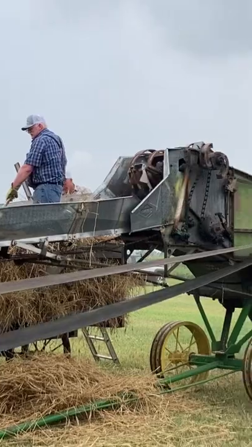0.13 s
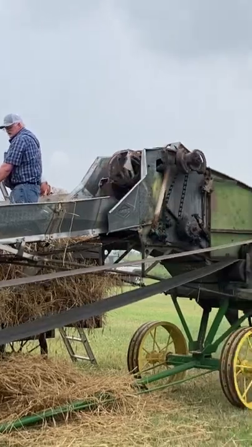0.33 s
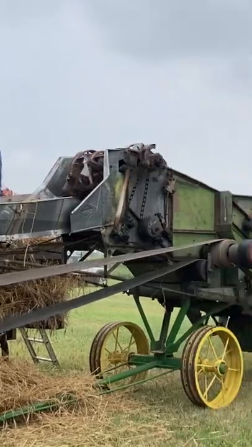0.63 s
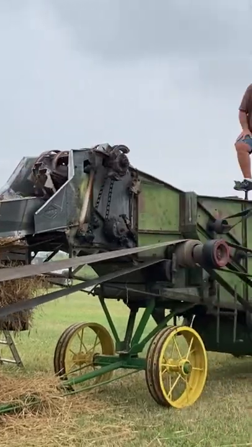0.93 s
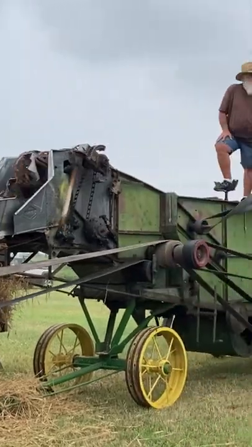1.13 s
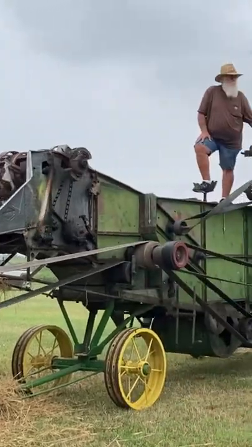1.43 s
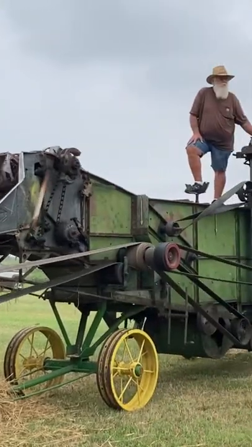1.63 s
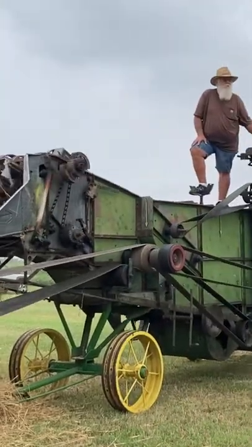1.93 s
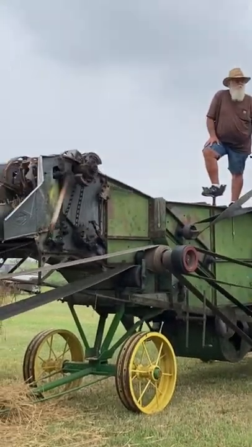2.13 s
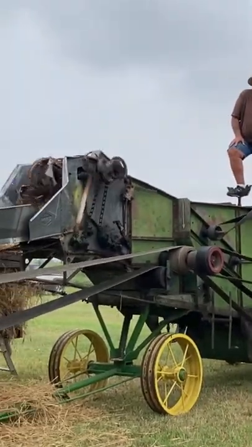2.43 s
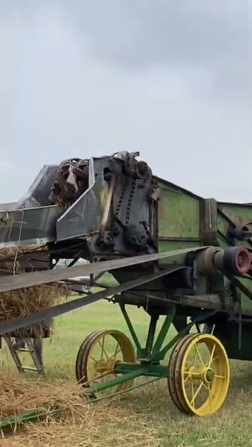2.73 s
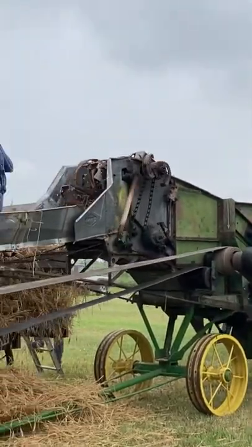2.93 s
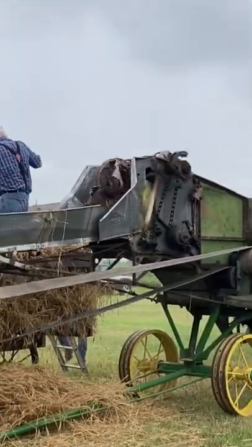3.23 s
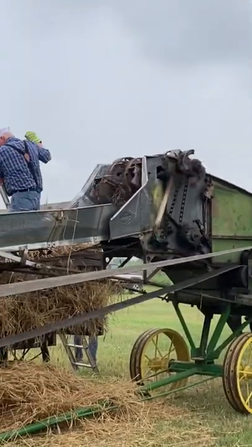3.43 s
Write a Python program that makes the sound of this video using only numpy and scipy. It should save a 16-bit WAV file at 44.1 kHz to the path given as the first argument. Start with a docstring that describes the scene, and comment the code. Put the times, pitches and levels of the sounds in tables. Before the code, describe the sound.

A belt-driven threshing machine starts abruptly, already at full speed, and runs throughout. Deep engine, drum and blower hum beats around 60 hertz under a hollow, booming rumble. Metal knocks about sixteen times a second, with harder clanks near 0.15, 0.8, 2.7 and 3.5. Sieves and panels rattle. Straw hisses and crackles, surging around 0.15, 1.2, 1.6, 2.6 and 3.2, snapping at 0.95 and 1.9, with a sharp final spurt near 3.55.

```python
"""The engine, threshing drum and blower of a belt-driven threshing machine hum as shaft harmonics.
Drum and blower lie close in pitch to the engine's eighth harmonic, and the three beat together.
Noise bursts through metal resonances knock twice per engine cycle, some harder.
Filtered noise makes the body's rumble, boom, rattle and drones; tapped panels ring.
Straw is crackling high noise that hisses steadily and rushes in surges, with a few snaps."""
import sys
import numpy as np
from scipy import signal
from scipy.fft import rfft, irfft
from scipy.io import wavfile

SR = 44100
rng = np.random.default_rng(int(sys.argv[2]) if len(sys.argv) > 2 else 0)


def dump(signal):
    """Clip the signal to [-1, 1] and save it as 16-bit WAV at the path in sys.argv[1]."""
    limited = np.clip(np.atleast_2d(signal).T, -1, 1)
    pcm = np.round(limited * 32767).astype(np.int16)
    wavfile.write(sys.argv[1], SR, pcm)


N = 157878
T, HZ = np.arange(N) / SR, np.maximum(np.fft.rfftfreq(N, 1 / SR), 1)

# engine harmonics align THUMP_S into each cycle; drum and blower harmonics align at IN_STEP_S
CYCLE_HZ, THUMP_S, IN_STEP_S = 7.89, .0628, 2.565
SPEED_WANDER_S = 0.00016  # rms lead or lag of a shaft
# drum sags under load and recovers, blower slows a little: (time [s], rate [Hz])
DRUM_SPEED_HZ = [(0, 59.8), (.35, 60.35), (.9, 59.8), (1.3, 59.1), (1.6, 59.85), (2.25, 59.7), (2.55, 60.1),
                 (2.85, 59.85), (3.5, 59.95)]
BLOWER_SPEED_HZ = [(.35, 64.55), (.7, 64.1), (1.6, 63.9), (2.5, 63.77), (3.5, 63.7)]
# level curves added to the drum and blower harmonics: (time [s], relative level [dB])
DRUM_LEVEL_DB = [(0, -2), (.5, 3.5), (.95, -0.5), (1.35, 0), (1.85, 2.5), (2.3, -1), (3.5, 0)]
BLOWER_LEVEL_DB = [(.3, -7), (.9, 0), (1.2, -6.5), (1.5, 3), (1.9, -.5), (2.3, -0.5), (3.5, 2)]
# shaft harmonics: (multiple of the rate, level [dB])
ENGINE_ORDERS = [(5, -52), (7, -32), (8, -26), (9, -38), (11, -42), (12, -35), (13, -39.5), (15, -42),
                 (16, -40.5)]
DRUM_ORDERS = [(1, -23), (2, -32), (4, -38), (8, -46)]
BLOWER_ORDERS = [(1, -21), (2, -43)]
# wavering tones of body and pulleys: (frequency [Hz], resonance width [Hz], level [dB])
DRONES = [(124.7, 4.9, -33.5), (186.75, 7.8, -35.5), (926, 60, -49.5), (216.6, 7.5, -40.5),
          (1063, 8.3, -49), (5540, 24, -55)]

# knocks per engine cycle: (time in cycle [s], relative clatter level [dB], relative thud level [dB])
KNOCKS = [(0.017, -2, -8.5), (0.0465, -2.5, 1)]
KNOCK_RISE_S, KNOCK_FALL_S, KNOCK_JITTER_S = 0.0042, 0.01, .0006
KNOCK_DB, KNOCK_SCATTER_DB, KNOCK_LIKENESS = -29, 0.66, 0.64
THUD_DB, THUD_HZ, THUD_WIDTH_HZ, THUD_RISE_S, THUD_FALL_S = -24.5, 300, 370, 0.0018, 0.0044
# harder knocks: (time [s], relative level [dB], frequency that rings most [Hz])
HARD_KNOCKS = [(.147, -1, 2050), (.401, -9, 1920), (.525, -3, 1950), (.778, 0.5, 2890), (.905, -4, 1500),
               (1.159, -7, 1980), (2.297, -3, 1870), (2.456, -6, 1930), (2.679, 3, 1970), (2.807, -6, 1900),
               (3.315, -4, 1810), (3.345, -9, 1910), (3.539, 7, 2300)]
HARD_RISE_S, HARD_FALL_S, HARD_FOCUS_DB_PER_OCTAVE = .0016, 0.01, 32
# metal resonances of the knocks: (frequency [Hz], resonance width [Hz], relative level [dB])
KNOCK_MODES = [(1452, 190, -7.5), (1930, 280, -3.5), (2400, 610, -11), (2823, 450, -4.5)]
CLATTER_LEAD_S = 0.00045  # left channel first

# body rumble spectrum: (frequency [Hz], relative level per Hz [dB])
RUMBLE_SPECTRUM_DB = [(10, -40), (26, -12), (42, -7.5), (65, -0.5), (82, 1.5), (105, 0), (150, -4),
                      (260, -11), (340, -10.5), (450, -12), (560, -16.5), (680, -23.5), (1000, -20.5),
                      (1600, -50), (4000, -77)]
RUMBLE_DB, RUMBLE_FLUTTER_DB = -24, 1.5
# hollow-case resonances: (frequency [Hz], resonance width [Hz], relative level [dB])
BOOM_MODES = [(319, 33, -5.5), (392.6, 41, 0), (444, 28, -10), (482.5, 23, -2), (556, 38, -8.5)]
# steady boom: (time [s], level [dB])
BOOM_LEVEL_DB = [(0, -32), (.7, -35), (1.2, -30), (1.55, -34), (1.95, -36.5), (2.25, -30.5), (2.45, -36.5),
                 (2.8, -36), (3.5, -34)]
# jolts added to the boom: (time [s], level [dB])
JOLTS = [(.065, -31), (.172, -28.5), (1.62, -28), (2.335, -28), (2.68, -36), (2.845, -31), (3.1, -33)]
JOLT_S = 0.015
# rattle spectrum of sieves and chains: (frequency [Hz], relative level per Hz [dB])
RATTLE_SPECTRUM_DB = [(200, -4), (450, -9.5), (700, -3.5), (980, 3), (1250, -1.5), (1800, -1.5), (2300, -6),
                      (3150, -8), (3500, -4), (4400, -4), (5300, -10.5), (7000, -9.5), (9000, -58),
                      (14000, -42)]
RATTLE_DB, RATTLE_FLUTTER_DB = -31, 1.5
# loose panels and rods
PANEL_LOW_HZ, PANEL_HIGH_HZ, PANEL_TAPS_PER_S = 300.7, 2648, 9
PANEL_RING_S = 0.13  # time to fall 60 dB
PANEL_DB, PANEL_TILT_DB_PER_OCTAVE = -35.5, -1.5

# steady straw hiss spectrum: (frequency [Hz], relative level per Hz [dB])
STRAW_SPECTRUM_DB = [(2500, -16), (4500, -10), (6000, -11), (7300, 1), (9000, -.5), (10700, 1.5),
                     (13000, -2), (15700, -4.5)]
STRAW_DB, STRAW_FLUTTER_DB = -28.5, 1.5
CRACKLES_PER_S, CRACKLE_S, CRACKLE_SIZE, CRACKLE_SPREAD_DB = 440, 0.00062, 0.64, 3
# surges of straw going through: (time [s], relative level [dB])
SURGES = [(.13, 1.5), (.62, -18), (1.165, 0.5), (1.6, -0.5), (1.78, -8.5), (2.09, -2.5), (2.62, 0.5),
          (3.24, -1)]
SURGE_RISE_S, SURGE_FALL_S, SURGE_DB = 0.023, 0.11, -30.5
# surge spectrum: (frequency [Hz], relative level per Hz [dB])
SURGE_SPECTRUM_DB = [(1200, -11), (2500, 8.5), (4200, 5), (7300, 10.5), (10000, 9), (15000, -10)]
# strength of the surges' opposite-polarity likeness: (frequency [Hz], likeness [0-1])
SURGE_LIKENESS = [(4000, 0), (6000, 0.1), (8500, 1)]
# one sharp spurt of chaff; SPURT_DB is its lift of the steady hiss
SPURT_AT_S, SPURT_DB, SPURT_S = 3.544, 11.5, .009
# stalks snapping: (time [s], level [dB])
SNAPS = [(0.141, -32), (.945, -22), (1.908, -15)]
SNAP_S = 0.0012
HISS_LAG_S = 0.0002207  # left channel later

# left-right likeness of the low sounds: (frequency [Hz], likeness [0-1])
LIKENESS = [(60, .99), (125, .96), (250, .88), (450, .9), (750, 0), (1500, .9)]
# left minus right: (frequency [Hz], level difference [dB])
BALANCE_DB = [(60, -2.5), (110, -1.9), (380, 0.1), (700, 1.8), (2400, -0.3), (15000, -0.3)]
START_S, STOP_BAND_HZ = .035, 16600


def from_db(db):
    """Decibels to gain."""
    return 10 ** (np.asarray(db) / 20)


def rms_one(x):
    """Scale to an rms of one."""
    return x / np.sqrt(np.mean(x ** 2) + 1e-20)


def over_hz(points):
    """Table read on a log-frequency axis."""
    hz, value = np.transpose(points)
    return np.interp(np.log(HZ), np.log(hz), value)


def over_time(points):
    """Curve read at every sample."""
    return np.interp(T, *np.transpose(points))


def shaped(x, gain):
    """Filter by a gain per frequency; rms one."""
    return rms_one(irfft(rfft(x) * gain, N))


def drift(rate_hz):
    """Low-passed random curve with a spread of one."""
    return shaped(rng.standard_normal(N), 1 / (1 + (HZ / rate_hz) ** 2))


def resonance(hz, width_hz):
    """Response of one resonance, one at its top."""
    return 1 / (1 + 1j * (HZ ** 2 - hz ** 2) / (HZ * width_hz))


def bump(at_s, width_s):
    """Gaussian envelope, one at its top."""
    return np.exp(-((T - at_s) / width_s) ** 2 / 2)


def stereo_noise(gain, likeness, lag_s=0, envelope=1):
    """Enveloped, then coloured noise, partly alike in both channels, left late by lag_s; rms one."""
    alike = np.clip(likeness, -.995, .995)  # negative: opposite polarity
    mid, side = rfft(rng.standard_normal((2, N)) * envelope)
    mid = mid * np.sqrt(1 + alike)
    side = side * np.sqrt(1 - alike)
    left = (mid + side) * np.exp(-2j * np.pi * HZ * lag_s)
    right = mid - side
    return rms_one(irfft(gain * np.array([left, right]), N))


def impacts(per_s, fall_s, size, spread_db):
    """Envelope of a steady wash with many small decaying impacts standing out of it."""
    struck = rng.random(N) < per_s / SR
    hits = struck * size * from_db(spread_db * np.minimum(rng.exponential(1, N), 4))
    power_fade = np.exp(-2 / (fall_s * SR))
    power = signal.lfilter([1], [1, -power_fade], hits ** 2 + 1e-18)
    return np.sqrt(1 + power)


def burst(start_s, rise_s, fall_s):
    """Sample span and envelope of one short blow."""
    first = max(0, int(start_s * SR))
    age_s = T[:max(0, min(SR // 10, N - first))]
    shape = 2 * (1 - np.exp(-age_s / rise_s)) * np.exp(-age_s / fall_s)
    return slice(first, first + len(age_s)), shape


def panels(count=36):
    """Random taps ring the sheet-metal modes, each with its own right-channel delay."""
    out = np.zeros((2, N))
    fade = from_db(-60 / (PANEL_RING_S * SR))
    modes_hz = np.geomspace(PANEL_LOW_HZ, PANEL_HIGH_HZ, count) * rng.uniform(0.96, 1.03, count)
    for hz in modes_hz:
        taps = (rng.random(N) < PANEL_TAPS_PER_S / SR) * rng.uniform(-1.21, 1, N)
        w = 2 * np.pi * hz / SR
        ring = signal.lfilter([0, np.sin(w)], [1, -2 * fade * np.cos(w), fade ** 2], taps + 1e-18)
        late = int(rng.random() * CLATTER_LEAD_S * SR)
        tilt_db = PANEL_TILT_DB_PER_OCTAVE * np.log2(hz / PANEL_LOW_HZ)
        out += from_db(tilt_db) * np.array([ring, np.roll(ring, late)])
    return from_db(PANEL_DB) * rms_one(out)


def rumble():
    """The shaking case radiates fluttering low noise."""
    flutter = from_db(RUMBLE_FLUTTER_DB * drift(27))
    colour = from_db(over_hz(RUMBLE_SPECTRUM_DB))
    return from_db(RUMBLE_DB) * stereo_noise(colour, over_hz(LIKENESS), envelope=flutter)


def boom():
    """The hollow case booms in a few low resonances, louder with each jolt."""
    jolts = sum(from_db(db) * bump(at_s, JOLT_S) for at_s, db in JOLTS)
    colour = sum(from_db(db) * np.abs(resonance(hz, width)) ** 2 for hz, width, db in BOOM_MODES)
    return (from_db(over_time(BOOM_LEVEL_DB)) + jolts) * stereo_noise(colour, over_hz(LIKENESS))


def rattle():
    """Sieves and chains rattle as noise under many small impacts."""
    flutter = from_db(RATTLE_FLUTTER_DB * drift(33))
    shaking = flutter * impacts(per_s=110, fall_s=0.0027, size=.6, spread_db=1.5)
    colour = from_db(over_hz(RATTLE_SPECTRUM_DB))
    noise = stereo_noise(colour, likeness=0.077, lag_s=-CLATTER_LEAD_S, envelope=shaking)
    return from_db(RATTLE_DB) * noise


def straw():
    """Stalks and chaff hiss, crackle and snap; surges add a brighter rush of noise."""
    flutter = from_db(STRAW_FLUTTER_DB * drift(106))
    crackle = flutter * impacts(CRACKLES_PER_S, CRACKLE_S, CRACKLE_SIZE, CRACKLE_SPREAD_DB)
    spurt = bump(SPURT_AT_S, SPURT_S)
    surges = sum(from_db(db) * bump(at_s, np.where(T < at_s, SURGE_RISE_S, SURGE_FALL_S))
                 for at_s, db in SURGES)
    snaps = sum(from_db(db) * (T >= at_s) * np.exp(-np.abs(T - at_s) / SNAP_S) for at_s, db in SNAPS)
    hiss = stereo_noise(from_db(over_hz(STRAW_SPECTRUM_DB)), -1, HISS_LAG_S, crackle)
    rush_colour = from_db(over_hz(SURGE_SPECTRUM_DB))
    rush = stereo_noise(rush_colour, -over_hz(SURGE_LIKENESS), HISS_LAG_S, crackle)
    hiss_level = from_db(STRAW_DB + SPURT_DB * spurt) + snaps
    rush_level = from_db(SURGE_DB) * (surges + spurt)
    return hiss_level * hiss + rush_level * rush


def knocks():
    """Two bursts of resonant clatter and thud per engine cycle, plus harder clatter blows."""
    clatter, thud = np.zeros((len(KNOCK_MODES), N)), np.zeros(N)
    for cycle_s in np.arange(0, N / SR, 1 / CYCLE_HZ):
        for at_s, db, thud_db in KNOCKS:
            start_s = cycle_s + at_s + KNOCK_JITTER_S * rng.normal()
            span, shape = burst(start_s, KNOCK_RISE_S, KNOCK_FALL_S)
            modes_db = db + KNOCK_SCATTER_DB * rng.normal(size=(len(KNOCK_MODES), 1))
            clatter[:, span] += from_db(modes_db) * shape
            span, shape = burst(start_s, THUD_RISE_S, THUD_FALL_S)
            thud[span] += from_db(thud_db + KNOCK_SCATTER_DB * rng.normal()) * shape
    for at_s, db, focus_hz in HARD_KNOCKS:
        span, shape = burst(at_s, HARD_RISE_S, HARD_FALL_S)
        octaves_off = np.abs(np.log2(np.array(KNOCK_MODES)[:, :1] / focus_hz))
        clatter[:, span] += from_db(db - HARD_FOCUS_DB_PER_OCTAVE * octaves_off) * shape
    metal = np.zeros((2, N))
    for level, (hz, width_hz, db) in zip(clatter, KNOCK_MODES):
        ring = stereo_noise(resonance(hz, width_hz) ** 2, KNOCK_LIKENESS, -CLATTER_LEAD_S)
        metal += from_db(db) * level * ring
    thud_noise = stereo_noise(resonance(THUD_HZ, THUD_WIDTH_HZ) ** 2, over_hz(LIKENESS))
    return from_db(KNOCK_DB) * metal + from_db(THUD_DB) * thud * thud_noise


def drones():
    """Body and pulleys waver as noise through narrow resonances."""
    return sum(from_db(db) * shaped(rng.standard_normal(N), resonance(hz, width) ** 2)
               for hz, width, db in DRONES)


def hum(rate_hz, orders, in_step_s):
    """Harmonics of one turning shaft whose speed wanders slightly."""
    turns = np.cumsum(rate_hz * np.ones(N)) / SR
    turns = turns - np.interp(in_step_s, T, turns)
    turns = turns + rate_hz * SPEED_WANDER_S * drift(1.3)
    return sum(np.sqrt(2) * from_db(db) * np.cos(2 * np.pi * order * turns) for order, db in orders)


def blower():
    """Blower shaft harmonics at a slowly falling rate."""
    return from_db(over_time(BLOWER_LEVEL_DB)) * hum(over_time(BLOWER_SPEED_HZ), BLOWER_ORDERS, IN_STEP_S)


def drum():
    """Drum shaft harmonics at a rate that sags and recovers."""
    return from_db(over_time(DRUM_LEVEL_DB)) * hum(over_time(DRUM_SPEED_HZ), DRUM_ORDERS, IN_STEP_S)


def engine():
    """Engine cycle harmonics, in phase at one thump per cycle."""
    return hum(CYCLE_HZ, ENGINE_ORDERS, THUMP_S)


def scene():
    """All parts of the machine, the bass leaning a little to the right."""
    body = panels() + rumble() + boom() + rattle()
    mix = body + straw() + knocks() + drones() + blower() + drum() + engine()
    tilt_db = over_hz(BALANCE_DB) * np.array([[.5], [-.5]])
    return irfft(rfft(mix) * from_db(tilt_db), N)


def record(dry):
    """Silence up to START_S, then an abrupt start; a steep low-pass cuts the top."""
    low_pass = signal.cheby2(20, 80, STOP_BAND_HZ, fs=SR, output="sos")
    return signal.sosfilt(low_pass, dry * (T >= START_S))


dry = scene()
out = record(dry)
dump(out)
```